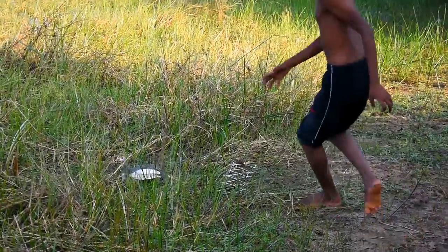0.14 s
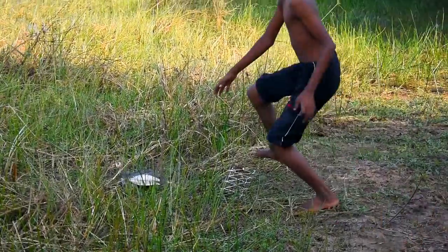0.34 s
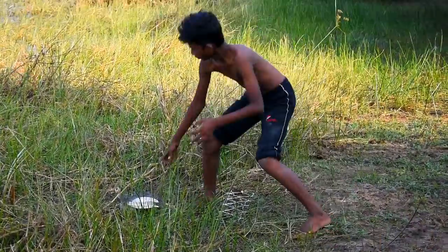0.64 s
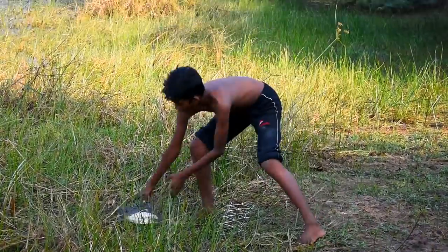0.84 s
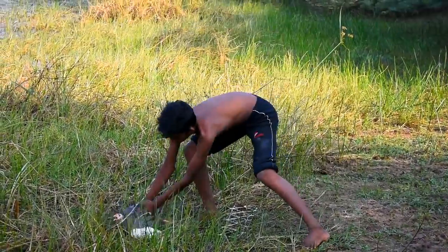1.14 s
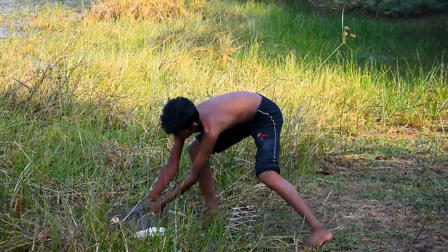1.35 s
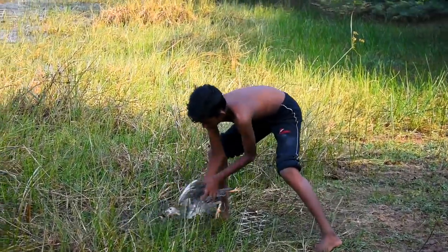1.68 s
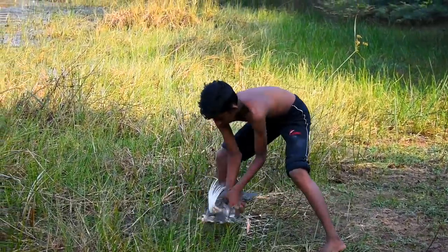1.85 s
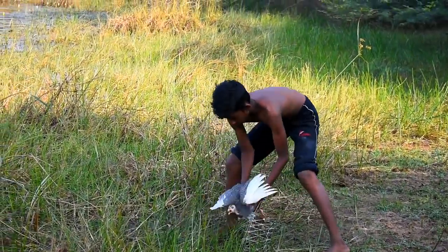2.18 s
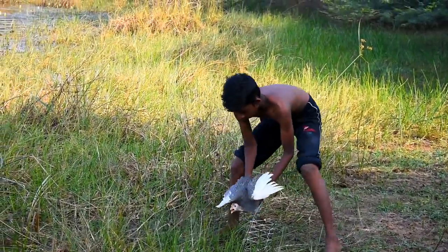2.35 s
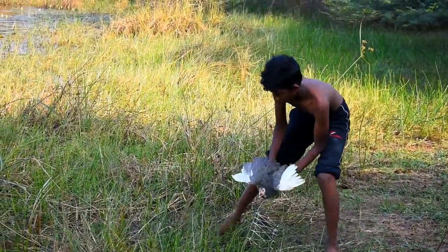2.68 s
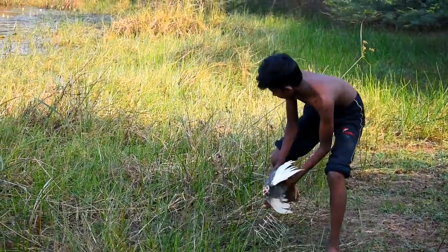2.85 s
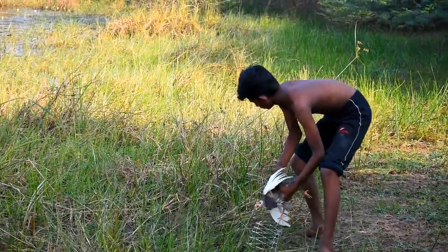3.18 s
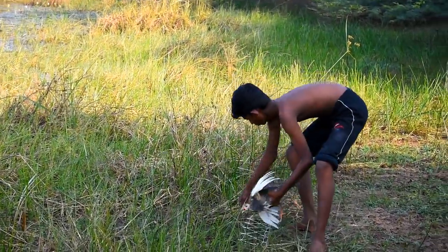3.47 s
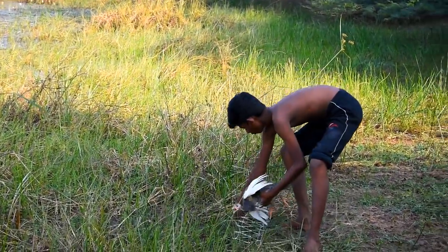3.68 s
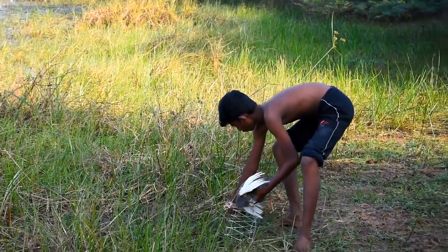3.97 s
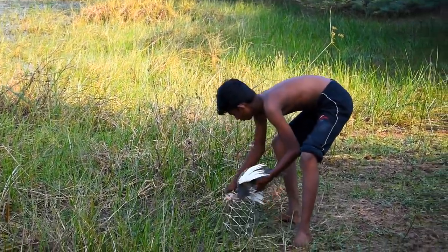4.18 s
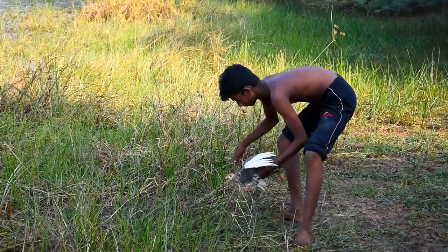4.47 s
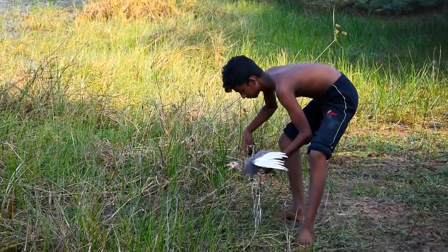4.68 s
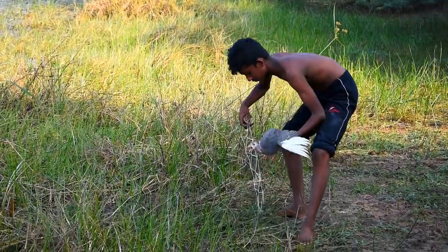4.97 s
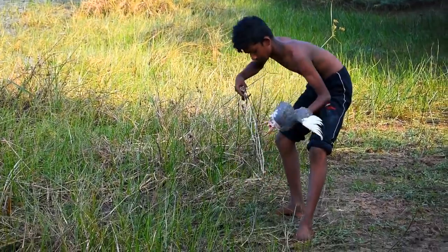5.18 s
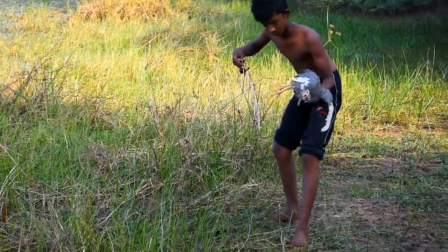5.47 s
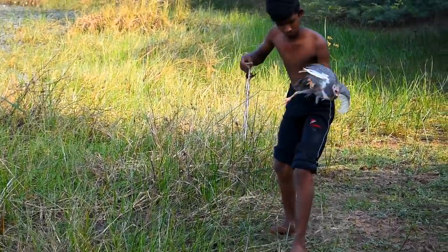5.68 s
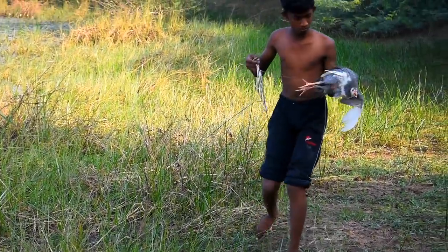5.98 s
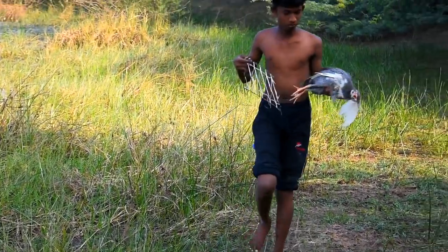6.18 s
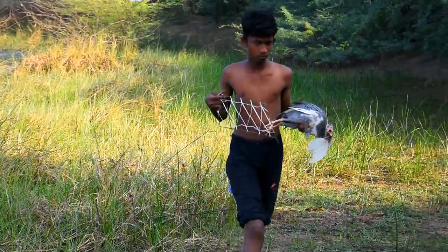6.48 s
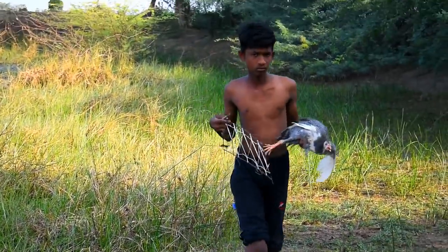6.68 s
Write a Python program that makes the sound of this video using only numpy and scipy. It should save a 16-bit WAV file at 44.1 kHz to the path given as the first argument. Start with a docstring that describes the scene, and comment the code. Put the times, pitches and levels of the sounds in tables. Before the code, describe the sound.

After a dry grass brush, a bird repeats clipped, raspy notes steadily, then rising whistled squeals tear into harsh cries over low wind rumble.

```python
"""A brush of dry grass, then a guinea fowl close by: short harsh notes, later with four drawn-out cries.
Its syrinx is a nearly sinusoidal whistle near 3-4 kHz that breaks into a rasp of subharmonic strands and
random impulses when pushed; resonances of throat and beak colour the rasp.
Wind is filtered noise and brief pulses on the microphone; vegetation returns a decaying noise tail of the
calls, over the noise of distant leaves, air and a thin band of insects."""
import sys
import numpy as np
from scipy import signal
from scipy.fft import rfft, irfft, next_fast_len
from scipy.io import wavfile

SR = 44100
rng = np.random.default_rng(int(sys.argv[2]) if len(sys.argv) > 2 else 0)


def bounce(signal):
    """Save signal as a 16-bit WAV file at the path given by the first command-line argument."""
    frames = np.transpose(np.atleast_2d(signal))
    limited = np.clip(frames, -1, 1)
    pcm = np.round(limited * 32767).astype(np.int16)
    wavfile.write(sys.argv[1], SR, pcm)


N = 301644

# contours of the drawn-out cries, whistles pushed into a rasp:
# t/s, pitch f/Hz, whistle level/dB, rasp level/dB
SCREECH = [(3.555, 3680, -50, -62), (3.575, 3967, -30.5, -36), (3.6, 3950, -30, -24),
           (3.612, 3437, -25.5, -13), (3.7, 3417, -28, -14.5), (3.728, 3365, -19, -12.5)]
SQUEAL = [(4.849, 3700, -45.5, -57), (4.875, 3897, -16, -56), (4.9, 3933, -26.5, -36),
          (4.965, 3894, -27.5, -32.5), (5.005, 3800, -33, -51), (5.025, 3910, -28, -30.5),
          (5.065, 3824, -18, -33.5), (5.12, 3620, -23, -30), (5.132, 3440, -30, -16)]
HOARSE_CRY = [(5.505, 4000, -42, -54), (5.528, 3800, -20.5, -38), (5.55, 3866, -21.5, -21.5),
              (5.59, 3857, -18.5, -21.5), (5.616, 3980, -14, -23), (5.675, 3814, -17, -15.5),
              (5.715, 3730, -18, -15), (5.757, 3550, -27, -10)]
LONG_CRY = [(6.138, 3424, -42, -62), (6.17, 3760, -27.5, -57), (6.215, 3863, -19.5, -38.5),
            (6.268, 3977, -21, -35.5), (6.335, 3904, -20, -30), (6.385, 3945, -16, -36),
            (6.414, 3775, -12, -14.5), (6.435, 3786, -12, -12.5), (6.46, 3487, -27, -10.5)]
# spectrum of the turbulent hiss: f/Hz, level/dB
HISS = [(4500, -83), (6400, 8.5), (7100, 11.5), (7800, 12.5), (8800, 10), (10000, 12), (11200, 1),
        (12600, 4), (14200, -13), (15800, -16)]
# resonances of the throat: f/Hz, width/Hz, level/dB
THROAT = [(3730, 870, -0.5), (4242, 165, -1.5)]
# spectrum of wind rumble: f/Hz, level/dB
GUST = [(25, -32), (50, -24), (90, -4.5), (150, 1), (230, 2), (340, -4), (480, -15), (700, -30),
        (1200, -50)]


def undb(db):
    """Amplitude ratio from its logarithmic level in decibels."""
    return 10 ** (np.asarray(db) / 20)


def unit(x):
    """Normalisation: scale to an rms amplitude of 1."""
    return x / np.sqrt(np.mean(x ** 2) + 1e-18)


def shape(x, gain):
    """Linear filtering: multiply the spectrum by a gain function of frequency, then set rms 1."""
    size = next_fast_len(len(x))
    hz = np.fft.rfftfreq(size, 1 / SR) + 1  # the offset keeps log(hz) finite
    return unit(irfft(rfft(x, size) * gain(hz), size)[:len(x)])


def colour(x, points, shift=1):
    """Spectral envelope: filter through f/Hz, level/dB points, their frequencies scaled by a factor."""
    point_hz, point_db = np.transpose(points)
    return shape(x, lambda f: undb(np.interp(np.log(f), np.log(point_hz * shift), point_db)))


def ring(x, modes):
    """Parallel resonance: sum bell-shaped peaks given as f/Hz, width/Hz, level/dB."""
    return shape(x, lambda f: sum(undb(db) / (1 + (2 * (f - hz) / width) ** 2) for hz, width, db in modes))


def wobble(n, rate):
    """Slow random modulation: straight lines between rate random values a second, spread near 1."""
    steps = np.arange(n) * rate / SR
    knots = np.arange(int(steps[-1]) + 2)
    return 1.2 * np.interp(steps, knots, rng.standard_normal(len(knots)))


def ramp(t, length):
    """Smooth onset: a squared sine rises from 0 to 1 over length s."""
    return np.sin(np.pi / 2 * np.clip(t / length, 0, 1)) ** 2


def times(start, end):
    """Sampling: the sample times of a span, in s, within the scene."""
    return np.arange(max(int(start * SR), 0), min(int(end * SR), N)) / SR


def add(out, t, x):
    """Superposition: mix a sound in at its sample times."""
    first = round(t[0] * SR)
    out[first:first + len(x)] += x


def fowl():
    """A vibrating syrinx voices short notes, drawn-out cries and thin squeaks, added by superposition."""
    # short notes and the harsh ends of cries: start t/s, end t/s, nominal level/dB, pitch f/Hz,
    # roughness (0.11 to 1.2), undertone f/Hz, undertone nominal relative level/dB, brightness level/dB
    notes = [(0.122, 0.166, -8, 2957, 0.11, 1464, -24, -1.5),
             (0.504, 0.546, -9.5, 3053, 0.55, 1452, -23, 0), (0.77, 0.839, -9.5, 3090, 0.65, 1564, -23, 2),
             (0.969, 0.994, -11.5, 3140, 0.27, 1574, -28, 2),
             (0.999, 1.009, -5.5, 3080, 0.14, 1581, -25, 1.5),
             (1.18, 1.237, -10, 3270, 0.59, 1514, -18.5, 7),
             (1.396, 1.419, -17.5, 3200, 0.67, 1577, -11.5, 1.5),
             (1.42, 1.436, -15.5, 3006, 0.27, 1577, -27, 0), (1.56, 1.613, -13, 3257, 0.56, 1726, -19.5, 1),
             (1.737, 1.806, -10.5, 2960, 0.54, 1600, -13.5, -4.5),
             (1.962, 2.033, -9, 2870, 0.44, 1611, -11.5, 2),
             (2.225, 2.287, -10.5, 2754, 1.07, 1620, -10, 1.5),
             (2.46, 2.505, -11.5, 2740, 1.2, 1525, -11, 1), (2.722, 2.784, -11, 2680, 0.49, 1553, -9, 4),
             (2.981, 3.056, -10, 2965, 0.63, 1573, -8.5, 0.5),
             (3.27, 3.336, -10, 2710, 0.53, 1629, -13.5, 1),
             (3.726, 3.759, -9.5, 2640, 0.66, 1700, -32, -6),
             (4.025, 4.074, -10.5, 2735, 0.4, 1608, -13, 0.5),
             (4.311, 4.369, -10.5, 2920, 0.87, 1559, -15.5, 3),
             (4.577, 4.648, -10.5, 2975, 0.5, 1579, -10.5, -1),
             (5.133, 5.156, -9.5, 2793, 0.5, 1700, -21, -4), (5.758, 5.794, -8.5, 2774, 0.5, 1715, -31, -3),
             (6.46, 6.503, -9.5, 2696, 0.63, 1701, -27, 1.5)]
    # voicing of each cry: contour, then undertone, beak and hiss level/dB relative to the rasp,
    # flutter spread of the rasp/dB, overtone level/dB relative to the whistle
    cries = [(SCREECH, -13, -7, -23.5, 0.91, -24), (SQUEAL, -22, -19, -15.5, 4.6, -23.5),
             (HOARSE_CRY, -22, -17, -19, 1.7, -18), (LONG_CRY, -15.5, -13.5, -20.5, 0.98, -28.5)]
    # thin squeaks between the notes: t/s, length/s, first f/Hz, last f/Hz, level/dB
    squeaks = [(0.457, 0.037, 4130, 3900, -31.5), (0.484, 0.031, 4470, 4650, -27.5),
               (0.843, 0.019, 3400, 2720, -39), (1.024, 0.018, 3940, 2940, -28.5),
               (1.159, 0.0095, 3120, 3230, -29.5), (1.444, 0.011, 3780, 2970, -32),
               (4.008, 0.025, 3380, 3520, -17), (4.917, 0.0075, 3920, 3900, -18),
               (6.114, 0.02, 2850, 3400, -30.5), (6.603, 0.023, 3150, 2890, -42.5)]
    out = np.zeros(N)
    for row in notes:
        t = times(row[0] - .014, row[1] + 0.09)
        add(out, t, note(t, *row))
    for contour, *voicing in cries:
        t = times(contour[0][0] - .004, contour[-1][0] + 0.0036)
        add(out, t, cry(t, contour, *voicing))
    for start, length, first_hz, last_hz, db in squeaks:
        t = times(start, start + length)
        glide_hz = np.linspace(first_hz, last_hz, len(t))
        add(out, t, undb(db) * signal.windows.tukey(len(t), .7) * whistle(glide_hz, 0.027))
    return out


def note(t, start, end, db, pitch_hz, rough, under_hz, under_db, bright_db):
    """Onset of chaos: a whistle drops onto its pitch, tears into wavering strands and is cut off."""
    # spectrum of the rasp: f/Hz, level/dB
    rasp_spectrum = [(300, -29), (1150, -93), (1800, -12), (2250, -5.5), (2650, 6.5), (2950, 2.5),
                     (3400, -7), (3750, -6.5), (4300, -62), (5200, -56)]
    # resonances of the beak: f/Hz, width/Hz, level/dB
    beak_modes = [(5420, 507, 9.5), (5930, 580, -15)]
    pitch_sag = 0.015  # share by which the pitch line starts above its mean and ends below it
    throat_db, beak_db, hiss_db = -12.5, -13.5, -25  # relative to the core, before brightness and roughness
    full_beak_roughness = 0.4  # the beak rings in proportion to roughness, up to this value
    n, age = len(t), t - start

    scoop = 1 + .05 * np.exp(-np.maximum(age, -.011) / .006)
    bend = scoop * (1 + .028 * wobble(n, 150))
    hz = pitch_hz * np.interp(t, [start, end], [1 + pitch_sag, 1 - pitch_sag]) * bend
    broken = ramp(age + 0.0013, 0.0097)
    # the syrinx slips in and out of chaos within a note
    chaos = np.clip(rough ** .8 * broken * (1 + .35 * wobble(n, 110)), 0, 1)
    source = strands(2 * under_hz * bend) + .55 * impulses(n)
    rasp = colour(source, rasp_spectrum, (pitch_hz / 2850) ** 0.7)
    core = unit((1 - chaos) * whistle(hz, .1 * chaos) + np.sqrt(chaos) * rasp)

    # the undertone near half the pitch arches with it
    under_tone = whistle(under_hz * bend, 0.0442) * undb(2.16 * wobble(n, 199.5) - 3.5)
    under = under_tone + undb(-13) * ring(source, [(under_hz, 220, 0)])
    beak = undb(beak_db) * min(rough / full_beak_roughness, 1) * ring(source, beak_modes)
    throat = undb(throat_db) * ring(source, THROAT)
    hiss = undb(hiss_db) * colour(source, HISS)
    upper = beak + undb(bright_db) * (throat + hiss)
    voice = saturate(core + broken * (undb(under_db) * under + upper), 0.2)

    lead_in = undb(-9.0 - 10 * rough) * ramp(age + 0.012 * rough ** 0.68, 0.005)
    attack = np.maximum(lead_in, ramp(age + 0.0017, 0.0038))
    push = attack * np.exp(-np.maximum(t - end + 0.0042, 0) / 0.0042)
    # the air comes in uneven pulses, so the sound catches about every ten milliseconds
    pulses = np.cumsum(95 * (1 + .25 * wobble(n, 80))) / SR
    catch_db = .8 - np.sin(np.pi * pulses) ** 4 * np.abs(3 + 2.1 * wobble(n, 85))
    decline_db = -2.0 * (age / (end - start) - .5)
    return undb(db + 1 + catch_db + decline_db) * push * voice


def cry(t, contour, under_db, beak_db, hiss_db, flutter_db, overtone_db):
    """Nonlinear phonation: as the rasp gains on a held whistle, its pitch jitters and its strands dissolve."""
    flutter_hz, wander = 69.93, 0.01003  # rate of trembling; scale of the relative pitch wander
    s, pitch, *levels = np.transpose(contour)
    n, hz = len(t), registers(t, s, pitch)
    whistle_db, rasp_db = (np.interp(t, s, level) for level in levels)
    rasp_db = rasp_db + flutter_db * wobble(n, flutter_hz)
    chaos = 1 / (1 + undb(whistle_db - rasp_db))
    hz = hz * (1 + wander * np.sqrt(2 * chaos) * wobble(n, flutter_hz))

    # the strands dissolve into impulses as the rasp takes over
    held = np.sqrt(1 - chaos) * strands(hz, between_db=-2, flicker_db=4, stray_hz=45)
    source = unit(held + .8 * impulses(n))
    jitter = .003 + .045 * chaos ** 1.5
    unsteady_db = 5.3 * chaos * wobble(n, 295.4) + 0.29 * wobble(n, 58.0)
    tone = undb(whistle_db + unsteady_db) * whistle(hz, jitter, second_db=overtone_db)

    rasp = saturate(ring(source, [(2590, 260, -0.9), (3000, 290, 1)]), 0.29)
    rasp = rasp + undb(hiss_db) * colour(source, HISS) + undb(-15.5) * ring(source, THROAT)
    under = undb(rasp_db + under_db) * whistle(hz / 2, .028, second_db=-24)
    # the open beak rings so strongly that it almost sings
    sing = .8 * whistle(np.full(n, 5520), .03, second_db=-40)
    beak = undb(rasp_db + beak_db) * unit(sing + ring(source, [(5520, 450, 0), (6200, 800, -13)]))
    grit = undb(2.2 * wobble(n, 300))
    fade = ramp(t - t[0], 0.0036) * ramp(t[-1] - t, 0.0056)
    return fade * (tone + under + grit * (undb(rasp_db) * rasp + beak))


def registers(t, s, hz):
    """Register break: pitch glides between points but jumps at once into a higher mode and back."""
    high_start, high_end, high_ratio = 4.893, 5.015, 1.18  # s, s, pitch ratio; within the squeal
    high = (t > high_start) & (t < high_end)
    return np.interp(t, s, hz) * np.where(high, high_ratio, 1)


def whistle(hz, jitter, second_db=-27):
    """Self-sustained oscillation: membranes swing almost as a sine, with jitter and unsteady overtones."""
    phase = 2 * np.pi * np.cumsum(hz * (1 + jitter * wobble(len(hz), 900))) / SR
    overtones = undb(second_db) * np.sin(2 * phase) + undb(-43) * np.sin(3 * phase)
    return np.sqrt(2) * (np.sin(phase) + undb(3.8 * wobble(len(hz), 54.3)) * overtones)


def strands(hz, between_db=-3, flicker_db=5.5, stray_hz=55, count=22):
    """Period doubling, twice: partials at every quarter of the pitch bend together and flicker alone."""
    n, out = len(hz), 0
    for k in range(1, count + 1):
        partial = k * hz / 4 + stray_hz * np.sqrt(k) * wobble(n, 700)
        db = between_db * (k % 2) + flicker_db * wobble(n, 147.4)
        sine = np.sin(2 * np.pi * (np.cumsum(partial) / SR + rng.random()))
        out = out + (partial < SR / 2) * undb(db) * sine
    return unit(out)


def impulses(n, rate_hz=4000, scatter_db=5.0, air=0.33):
    """Random impulse excitation: pulses uneven in time, size and sign, with broadband noise of air."""
    struck = rng.random(n) < rate_hz / SR
    sizes = undb(scatter_db * rng.standard_normal(n)) * rng.choice([-1, 1], n)
    return unit(unit(struck * sizes) + air * rng.standard_normal(n))


def saturate(x, amount):
    """Amplitude limitation: membranes can swing only so far, so the envelope is evened out."""
    envelope = np.abs(signal.hilbert(unit(x)))
    return unit(x / (envelope + 1.44) ** amount)


def grass():
    """Friction as impulse excitation: brushed dry stalks crackle through broad resonances."""
    # brushes of grass: t/s, length/s, level/dB
    rustles = [(0.052, 0.02, -36.5), (0.065, 0.031, -32), (0.898, 0.023, -47)]
    out = np.zeros(N)
    for start, length, db in rustles:
        t = times(start, start + length)
        stalks = impulses(len(t), rate_hz=1500)
        crackle = ring(stalks, [(2980, 1900, 15), (7160, 4000, 11.5), (9700, 1000, 8)])
        add(out, t, undb(db) * signal.windows.tukey(len(t), .5) * crackle)
    return out


def surroundings(x):
    """Scattering as convolution: grass answers at once; bushes and trees return a weak, decaying tail."""
    near_db, tail_db, tail_t60_s = -16.5, -29, 0.48
    t = times(0, 1)
    spectrum = [(1000, -1), (2800, 0), (4000, -3.5), (5500, 2.5), (9000, -5.0), (15000, -2.5)]
    scatter = colour(rng.standard_normal(len(t)), spectrum)
    near = unit(scatter * np.exp(-t / 0.006) * ramp(t - .003, 0.0086))
    far = unit(scatter * undb(-60 * t / tail_t60_s) * ramp(t - .01, 0.022))
    # dividing by the root of the length gives each unit part an energy of 1
    response = (undb(near_db) * near + undb(tail_db) * far) / np.sqrt(len(t))
    return signal.fftconvolve(x, response)[:N]


def wind():
    """Turbulent pressure: eddies rumble and crackle on the microphone; sharp ones thud for about a cycle."""
    # breeze rising and falling between the gusts: t/s, nominal level/dB
    breeze = [(0, -45.5), (0.3, -55), (0.5, -43.5), (0.93, -40.5), (1.07, -53.5), (1.7, -40.5), (1.9, -48),
              (2.75, -42), (2.95, -44), (3.3, -36), (3.8, -35), (4.75, -47), (5.6, -43), (6.4, -40.5),
              (6.57, -58), (6.7, -43), (6.84, -42.5)]
    # separate gusts: start t/s, length/s, nominal level/dB
    gusts = [(0.548, 0.047, -35.5), (0.712, 0.047, -32), (0.85, 0.076, -32.5), (1.495, 0.085, -29.5),
             (1.655, 0.018, -29), (2.022, 0.099, -33), (2.406, 0.02, -28.5), (2.565, 0.035, -31),
             (2.649, 0.038, -30.5), (3.07, 0.17, -29.5), (3.528, 0.077, -29.5), (3.932, 0.11, -33),
             (4.142, 0.058, -33.5), (4.45, 0.048, -33.5), (4.94, 0.095, -35), (5.308, 0.095, -36.5),
             (5.518, 0.054, -37.5), (5.733, 0.045, -42), (5.895, 0.088, -31), (6.148, 0.06, -38.5)]
    # sharpest buffets: t/s, nominal peak level/dB before the pulse envelope and high-pass, f/Hz
    buffets = [(0.894, -19.5, 404), (1.55, -14.5, 298), (2.066, -17.5, 328), (2.412, -24, 400),
               (3.174, -20, 420), (3.228, -14.5, 354), (3.553, -14, 279), (3.569, -20, 440),
               (4.01, -17.5, 350), (5.008, -18.5, 290)]
    attack_s, release_s = 0.012, 0.012
    t = np.arange(N) / SR
    power = undb(np.interp(t, *np.transpose(breeze)) + 2.6 * wobble(N, 17)) ** 2
    for start, length, gust_db in gusts:
        attack = ramp(t - start + attack_s / 2, attack_s)
        swell = attack * np.exp(-np.maximum(t - start - length, 0) / release_s)
        power = power + (undb(gust_db) * swell) ** 2
    db = 10 * np.log10(power)
    rumble = undb(db - 2.3 + 2.8 * wobble(N, 70)) * colour(rng.standard_normal(N), GUST)
    eddies = impulses(N, rate_hz=230, scatter_db=2, air=.2)
    spectrum = [(100, -30), (280, 4.5), (480, -0.5), (700, -8), (950, -20.5), (1500, -50)]
    # crackle grows faster than the wind level
    crackle = undb(-44.5 + 1.85 * (db + 35.5)) * colour(eddies, spectrum)
    out = rumble + crackle
    for start, peak_db, hz in buffets:
        t = times(start - .002, start + .02)
        cycles = (t - t[0]) * hz - 1
        add(out, t, undb(peak_db) * np.sin(2 * np.pi * cycles) * np.exp(-(cycles / .5) ** 2))
    # the microphone passes little of the deepest rumble
    return signal.sosfilt(signal.butter(2, 80, "high", fs=SR, output="sos"), out)


def field():
    """Incoherent sources as filtered noise: distant leaves, a low murmur of air and wavering insects."""
    # spectrum of the open field: f/Hz, level/dB
    field_spectrum = [(290, -25), (500, -7), (676, -3), (863, -3.5), (1040, -2), (1290, -9), (1410, 1.5),
                      (1560, -4.5), (2570, -1.5), (3010, -0.5), (3280, -5), (5350, -8.5), (8480, -11),
                      (9110, -10.5), (15500, -21)]
    air = colour(rng.standard_normal(N), field_spectrum) * undb(-49 + 0.033 * wobble(N, 2.65))
    low_air = colour(rng.standard_normal(N), GUST, 0.49) * undb(-59)
    insects = ring(rng.standard_normal(N), [(9100, 740, 0)]) * undb(-61 + 1.3 * wobble(N, 12))
    return air + low_air + insects


def scene():
    """Superposition of the bird, grass, their scattered sound, wind and field, in one channel."""
    close = fowl() + grass()
    return (close + surroundings(close) + wind() + field())[None]


def record(dry):
    """Soft saturation and band limiting: the recorder rounds the loudest peaks and cuts the top."""
    top_hz = 15750
    rounded = dry / (1 + np.abs(dry) ** 8) ** (1 / 8)
    return signal.sosfilt(signal.ellip(12, .2, 90, top_hz, fs=SR, output="sos"), rounded)


dry = scene()
out = record(dry)
bounce(out)
```